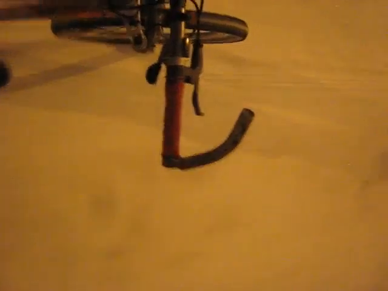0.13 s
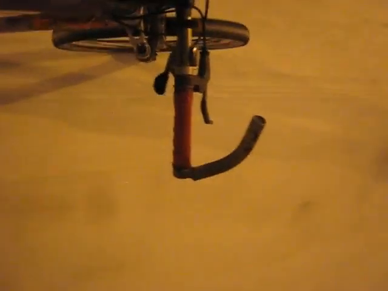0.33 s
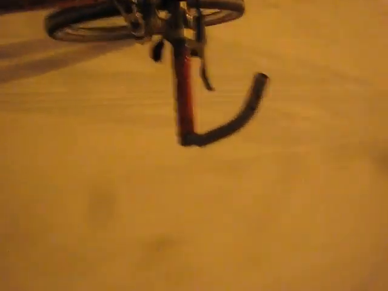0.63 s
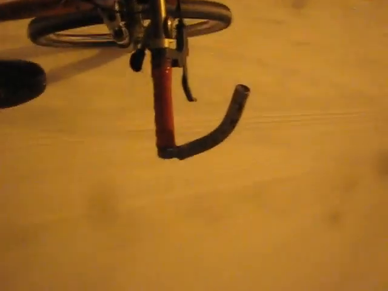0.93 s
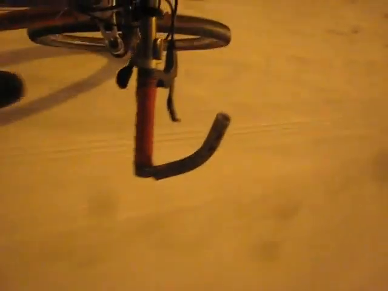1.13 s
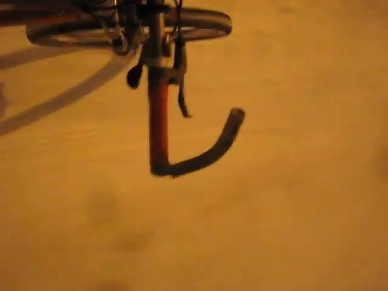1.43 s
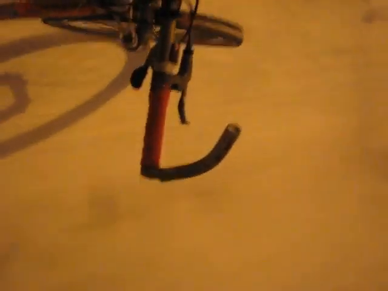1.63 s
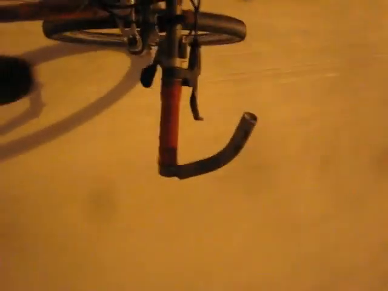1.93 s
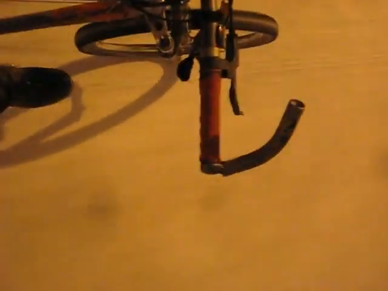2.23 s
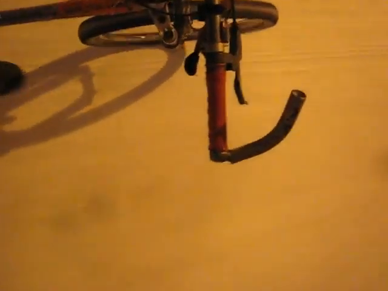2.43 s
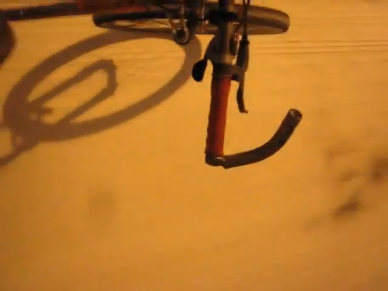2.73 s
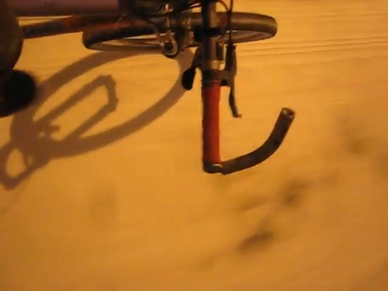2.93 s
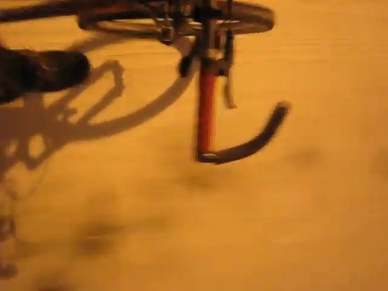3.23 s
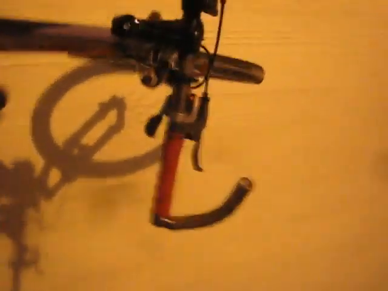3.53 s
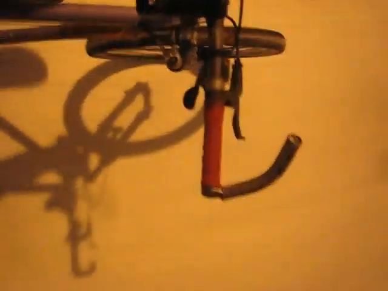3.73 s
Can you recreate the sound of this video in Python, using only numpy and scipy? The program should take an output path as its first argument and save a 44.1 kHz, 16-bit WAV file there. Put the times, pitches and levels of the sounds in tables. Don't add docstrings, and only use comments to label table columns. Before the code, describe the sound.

Wind gusts thump and flutter loudly on a microphone, with bicycle tyres hissing quietly through snow

```python
import sys
import numpy as np
from scipy import signal
from scipy.fft import rfft, irfft, next_fast_len
from scipy.io import wavfile
from scipy.ndimage import uniform_filter1d, map_coordinates

SR = 44100
rng = np.random.default_rng(int(sys.argv[2]) if len(sys.argv) > 2 else 0)


def transcribe(u):
    v = np.clip(np.atleast_2d(u).T, -1, 1)
    q = np.round(v * 32767).astype(np.int16)
    wavfile.write(sys.argv[1], SR, q)


def boost_factor(decibels):
    exponent = np.asarray(decibels, float) / 20
    return 10 ** exponent


N = 170667
TIME_S = np.arange(N) / SR


def rms_one(x):
    return x / np.sqrt(np.mean(x ** 2) + 1e-20)


def at_hz(points, hz):
    point_hz, point_db = np.transpose(points)
    return np.interp(np.log(hz), np.log(point_hz), point_db)


def follow(points):
    s, db = np.transpose(points)
    return np.interp(TIME_S, s, db)


def band_pass(x, low_hz, high_hz):
    return signal.sosfilt(signal.butter(2, [low_hz, high_hz], "band", fs=SR, output="sos"), x)


def drift(rate_hz):
    pole = np.exp(-2 * np.pi * rate_hz * 20 / SR)
    noise = rng.standard_normal(N // 20 + 2002)
    slow = signal.lfilter([1], [1, -2 * pole, pole ** 2], noise)[2000:]
    return np.interp(np.arange(N) / 20, np.arange(len(slow)), rms_one(slow))


def wind():
    # centre in seconds, half length in seconds, level in dB, eddy pitch in Hz.
    gusts = [(0.04, 0.015, -23.5, 258.8), (0.077, 0.0093, -23, 189.5), (0.168, 0.079, -17, 218.7),
             (0.274, 0.012, -19.0, 262.1), (0.374, 0.039, -16.5, 224.4), (0.459, 0.013, -23, 181.6),
             (0.505, 0.019, -17, 213.9), (0.564, 0.048, -17.5, 200), (0.77, 0.063, -16, 246.2),
             (0.88, 0.045, -17, 197.2), (0.988, 0.015, -21, 172.7), (1.044, 0.049, -17, 203.9),
             (1.23, 0.038, -17, 221.9), (1.326, 0.037, -18, 263.2), (1.391, 0.016, -14, 224.8),
             (1.455, 0.019, -20, 183.7), (1.513, 0.048, -17, 229.3), (1.585, 0.018, -18.5, 259.9),
             (1.677, 0.033, -20, 241.3), (1.753, 0.012, -18, 187.5), (1.819, 0.09, -18.5, 210.9),
             (2.09, 0.046, -20, 222.3), (2.379, 0.071, -22.5, 211.5), (2.655, 0.024, -25, 124.7),
             (2.836, 0.035, -25.5, 139.5), (2.94, 0.03, -21.5, 155.1), (3.107, 0.03, -18.0, 135),
             (3.37, 0.086, -28.5, 160.5), (3.702, 0.013, -21.5, 208.4), (3.775, 0.036, -21, 190.8)]
    # centre in seconds, half length in seconds,
    # level in dB, # eddy pitch in Hz.
    more_gusts = [(0.227, 0.0068, -19, 232.5), (2.069, 0.0096, -21, 230.6), (2.404, 0.01, -20, 259.4),
                  (2.726, 0.015, -22, 149.3), (0.715, 0.0092, -19.5, 219.2), (0.651, 0.039, -25, 200),
                  (2.171, 0.031, -29.5, 170.2), (2.238, 0.018, -32, 150.2), (2.463, 0.028, -27.5, 170.7),
                  (2.581, 0.042, -34.5, 119.2), (2.773, .02, -33.5, 119.3), (2.994, 0.046, -35, 139.7),
                  (3.166, .014, -25.5, 149.9), (3.233, .04, -26.5, 130), (3.477, 0.03, -30, 192.1),
                  (1.163, .03, -29, 150.1), (1.927, 0.031, -25.5, 170.4), (2.042, 0.016, -24, 178.4),
                  (3.292, 0.013, -22.5, 228.6), (3.339, 0.011, -24.5, 236.5), (3.525, 0.039, -30.5, 257.5),
                  (3.795, 0.014, -23, 240.3), (3.862, 0.016, -24, 176)]
    # frequency in Hz, level in dB per Hz.
    large_spectrum = [(30, -26.5), (60, -2), (110, 4), (200, 0), (330, -5.5), (480, -14), (800, -38.5),
                      (2500, -55)]
    # centre in seconds, half length in seconds,
    # level in dB, eddy pitch in Hz.
    spurts = [(0.042, 0.0065, -26, 697.4), (0.113, 0.046, -31.0, 829.5), (0.192, 0.018, -26.5, 676.4),
              (0.27, 0.017, -31, 745), (0.386, 0.023, -26, 618), (0.554, 0.051, -33, 683),
              (0.736, 0.069, -30.5, 650), (0.822, 0.052, -25.5, 581), (0.901, 0.012, -23.5, 603),
              (0.952, 0.0071, -32, 572.4), (1.011, 0.068, -34.5, 667), (1.068, 0.0058, -26, 607),
              (1.091, 0.0082, -29, 626.8), (1.236, 0.025, -22, 628.2), (1.314, 0.022, -19.5, 594.3),
              (1.392, 0.014, -24, 585.6), (1.472, 0.013, -24, 633.6), (1.546, 0.00802, -24, 801.7),
              (1.572, 0.015, -21.5, 701), (1.597, 0.0067, -21.5, 903), (1.633, 0.005, -25, 799.1),
              (1.65, 0.0038, -24, 941.3), (1.671, 0.0089, -22, 1050), (1.695, 0.005, -28, 752.4),
              (1.725, 0.013, -24, 856.8), (1.765, 0.012, -25.5, 950.3), (1.751, 0.0088, -21.5, 684.7),
              (1.828, 0.04913, -24.5, 653.6), (1.954, 0.0074, -29, 576), (2.09, 0.03, -30, 600),
              (2.29, 0.011, -33, 599.4), (2.325, 0.012, -32.5, 601), (2.955, 0.0058, -28, 550),
              (3.825, 0.0053, -30.5, 650), (2.139, 0.0045, -29.5, 692.6), (2.405, 0.0091, -36.5, 605.6),
              (3.084, 0.011, -28, 685.5), (3.293, 0.0084, -38, 549), (3.781, 0.0063, -36.5, 695.4)]
    # frequency in Hz, level in dB per Hz.
    small_spectrum = [(200, -27), (400, 5.5), (550, -0.5), (800, -6.5), (1200, -20.5), (2000, -45),
                      (4000, -55.5)]
    # time in seconds, level in dB.
    heave_levels = [(0.05, -18.5), (0.92, -39), (1.02, -25), (1.13, -29), (1.82, -31.5), (1.88, -23),
                    (1.95, -33), (3.2, -39.5), (3.29, -40), (3.37, -24.5), (3.46, -46), (3.87, -33)]

    flutter = 1.7 * np.tanh(0.7 * drift(35.0))
    chop = 0.9 * drift(90)
    small_flutter = 1.4 * np.tanh(0.298 * flutter + 0.7 * chop)
    large = eddies(gusts + more_gusts, large_spectrum, ref_hz=201.9, lull_db=-40.0, lull_hz=130,
                   flutter=flutter, size=600)
    small = eddies(spurts, small_spectrum, ref_hz=650, lull_db=-50, lull_hz=650,
                   flutter=small_flutter, size=200)
    deep = rms_one(band_pass(rng.standard_normal(N), 33, 60))
    return boost_factor(0.11) * large + small + boost_factor(follow(heave_levels)) * deep


def eddies(rows, spectrum, ref_hz, lull_db, lull_hz, flutter, size):
    gust_edge, evening = 2.3, 0.5
    flutter_octaves, flutter_db = 0.22, 3

    t = np.arange(0, N, 20) / SR
    s, half, db, hz = np.transpose(rows)[:, :, None]
    power = boost_factor(2 * db) * np.exp(-np.abs((t - s) / half) ** gust_edge)
    lull = boost_factor(2 * lull_db)
    total = power.sum(axis=0) + lull
    pitch = ((power * hz).sum(axis=0) + lull * lull_hz) / total
    total, pitch = (np.interp(TIME_S, t, v) for v in (total, pitch))
    speed = pitch / ref_hz * 2 ** (flutter_octaves * flutter)

    count = next_fast_len(3 * N)
    f = np.maximum(np.arange(count // 2 + 1) * SR / count, 1)
    shape = boost_factor(at_hz(spectrum, f)) * np.minimum(f / 20, 1) ** 2
    train = irfft(rfft(rng.standard_normal(count)) * shape, count)
    place = np.cumsum(speed) % (count - 1)
    heard = rms_one(map_coordinates(train, [place], order=1))

    swell = uniform_filter1d(uniform_filter1d(heard ** 2, size=size), size=size)
    evened = heard / (swell + 0.044) ** (evening / 2)
    return np.sqrt(total) * rms_one(evened * boost_factor(flutter_db * flutter))


def slaps():
    # start in seconds, peak level in dB, pitch in Hz.
    slap_rows = [(0.0398, -12.5, 700), (0.383, -19.5, 703), (0.566, -13, 892), (0.716, -17, 880),
                 (0.844, -22.5, 896.8), (1.512, -24.5, 1196), (1.695, -21, 906.5), (1.726, -7.5, 897),
                 (0.547, -16, 725), (0.602, -14.5, 749.5), (0.746, -14.5, 798), (0.899, -17, 980),
                 (1.065, -9, 668.2), (1.089, -13, 743), (1.209, -19, 690), (1.244, -13, 1000),
                 (1.308, -25, 759.2), (1.372, -13, 760.4), (1.505, -22.5, 802), (1.542, -12.5, 1004),
                 (1.571, -7.5, 800), (1.598, -14, 1215), (1.63, -7.5, 925), (1.650, -20, 1200),
                 (1.6639, -11, 1200), (1.6693, -4.5, 1140), (1.673, -22, 1382), (1.676, -18, 1220),
                 (1.757, -12.5, 1200), (1.824, -10, 900), (1.881, -13, 1100), (1.953, -21, 697.7),
                 (2.137, -16.5, 800), (2.951, -9, 261.3), (3.776, -9, 320), (3.082, -11.5, 209.6),
                 (2.084, -9, 298.5), (1.0625, -5, 300), (0.8964, -3, 390), (2.402, -23.5, 703.9),
                 (3.08, -21, 803), (3.777, -22.5, 690.6)]
    width_cycles, length = 0.694, 600
    edge_ratio, edge_db = 2.1, -15

    out, lag = np.zeros(N + length), np.arange(length) / SR
    for s, db, hz in slap_rows:
        start = int(s * SR)
        cycles = lag * hz - 2 * width_cycles
        for turn, gain_db in ((cycles, 0), (edge_ratio * cycles, edge_db)):
            bell = np.exp(-(turn / width_cycles) ** 2)
            out[start:start + length] -= boost_factor(db - 6 + gain_db) * np.cos(2 * np.pi * turn) * bell
    return out[:N]


def tyres():
    # time in seconds, level in dB.
    roll_levels = [(0.05, -40.5), (0.17, -46.5), (0.2, -46.5), (0.3, -48), (0.5, -44.5), (0.63, -49),
                   (0.69, -44.5), (0.79, -50), (0.95, -50.5), (1.1, -44), (1.235, -43), (1.249, -49),
                   (1.43, -49.5), (2.3, -52), (2.799, -48.5), (3.44, -45), (3.549, -44.5), (3.87, -44.5)]
    # centre in seconds, half length in seconds, rise in dB.
    crusts = [(0.1, 0.0064, 1), (0.147, .035, 5), (0.21, .008, 2.5), (0.267, .01, 4.5), (0.354, 0.024, 1.5),
              (0.414, 0.0067, 1.5), (0.487, 0.0094, 4), (0.544, 0.013, 6), (0.598, 0.0106, 2.5),
              (0.68, 0.014, 3.5), (0.712, .008, 1), (0.758, 0.0081, 4.5), (0.863, 0.034, 2),
              (0.997, .02, 3), (1.115, .03, 0.5), (1.146, .025, 3), (1.213, .03, -0.5), (1.284, 0.036, 3),
              (1.399, 0.0053, 3), (1.5, 0.018, 1), (1.752, 0.008, 6), (1.914, 0.0086, 3.5),
              (2.078, 0.0084, 1.5), (2.286, 0.023, 3.5), (2.637, .01, -2), (2.699, 0.018, -2.5),
              (2.964, 0.023, -0.5), (3.064, .01, 2.5), (3.394, 0.0076, 2.5), (3.552, 0.045, 3),
              (3.594, .015, -0.5), (3.836, .01, 2.5)]
    # frequency in Hz, level in dB per Hz.
    snow_spectrum = [(300, -3.5), (700, 4), (1100, 4.5), (1900, -2.5), (2500, -1.5), (3450, -3), (3800, -7),
                     (4600, -8), (5300, -18), (6700, -25.5)]
    crunch_per_s, crunch_share, grain_db = 4000, 0.15, 6.0
    patchy_db, surge_db = 1.15, 1.37
    crust_brightens, crust_pivot_hz = 0.13, 2500

    surge = 0.1 * drift(8.0) + 0.2 * drift(20.0) + 0.9 * drift(70.0)
    crust_db = sum(db * np.exp(-((TIME_S - s) / half) ** 2) for s, half, db in crusts)

    sizes = boost_factor(grain_db * np.minimum(rng.exponential(1, (2, N)), 5))
    grains = sizes * rng.choice([-1, 1], (2, N))
    born = rng.random((2, N)) < crunch_per_s * boost_factor(3.0 * surge + 1.5 * crust_db) / SR
    source = crunch_share * rms_one(grains * born) + rng.standard_normal((2, N))

    out, edges = 0, 250 * 2 ** np.arange(0, 5, 1 / 6)
    for k, (low, high) in enumerate(zip(edges, edges[1:])):
        band = band_pass(source[k % 2], low, high)
        level_db = at_hz(snow_spectrum, np.sqrt(low * high)) + patchy_db * drift(7.5)
        octaves_up = np.log2(max(low / crust_pivot_hz, 1))
        out = out + band * boost_factor(level_db + crust_brightens * crust_db * octaves_up)
    return boost_factor(follow(roll_levels) + 5.5 + crust_db + surge_db * surge) * rms_one(out)


def ticks():
    # time in seconds, peak level in dB, ring in dB relative to the peak.
    tick_rows = [(0.041, -21, -20), (0.4701, -57, -41), (0.5894, -36, -25), (1.269, -40, -11),
                 (1.6497, -42, -39), (0.683, -36, -30), (1.9043, -33.5, -13), (3.39, -46, -29),
                 (2.075, -34.5, -5), (3.138, -36.5, 0.5), (3.1647, -30, -8.5)]
    s, db, ring_db = np.transpose(tick_rows)
    metal = ring(s, db + ring_db, hz=4470, t60=0.032)
    crack = ring(s, db + 12, hz=4050, t60=0.00061)
    return metal - crack


def ring(s, db, hz, t60):
    clicks = np.full(N, 1e-18)
    clicks[(np.atleast_1d(s) * SR).astype(int)] = boost_factor(db)
    r, w = boost_factor(-60 / (t60 * SR)), 2 * np.pi * hz / SR
    return signal.lfilter([0, np.sin(w)], [1, -2 * r * np.cos(w), r * r], clicks)


def scene():
    return (wind() + slaps() + tyres() + ticks())[None]


def low_pass(x):
    return signal.sosfilt(signal.butter(12, 16800, fs=SR, output="sos"), x)


def record(dry):
    ceiling, top_hz, start_s = 0.7, 8020, 0.0363
    x = ceiling * np.tanh(dry / ceiling)
    x = signal.sosfilt(signal.cheby2(10, 70, top_hz, fs=SR, output="sos"), x)
    x = x * (np.arange(N) >= start_s * SR)
    return low_pass(x)


dry = scene()
out = record(dry)
transcribe(out)
```